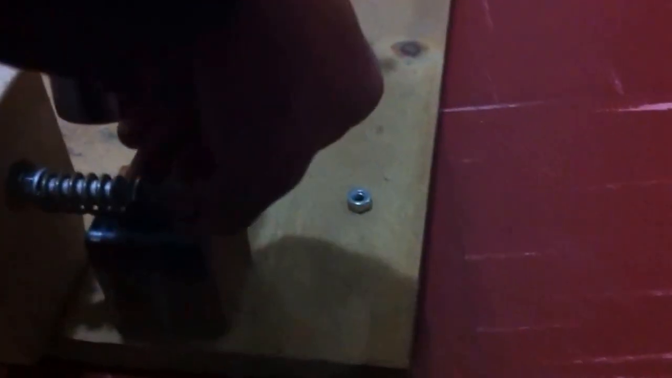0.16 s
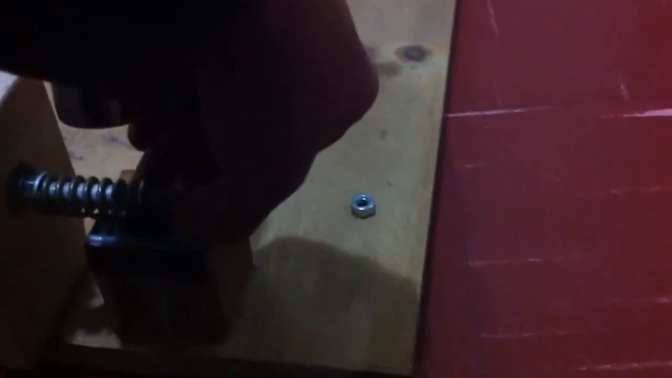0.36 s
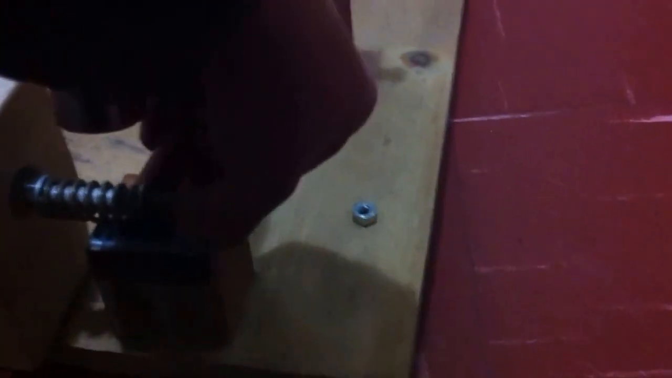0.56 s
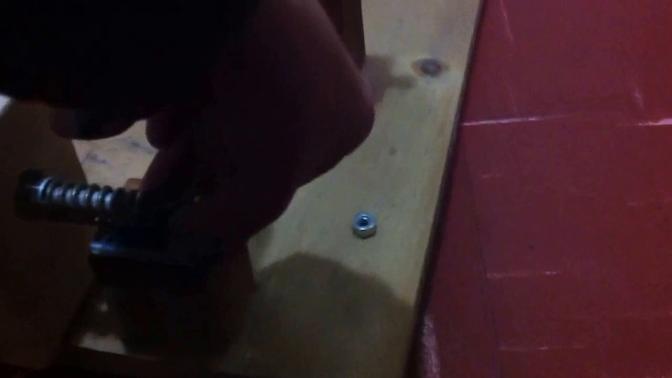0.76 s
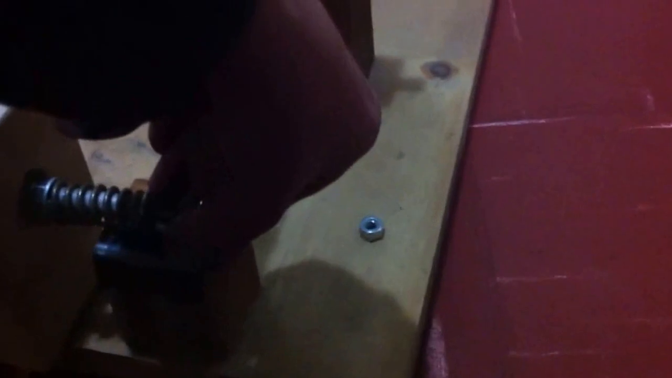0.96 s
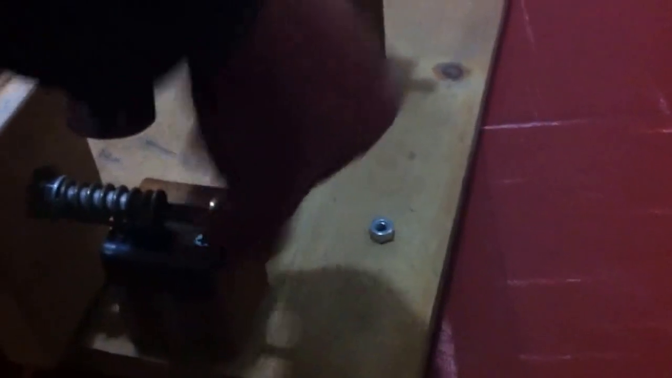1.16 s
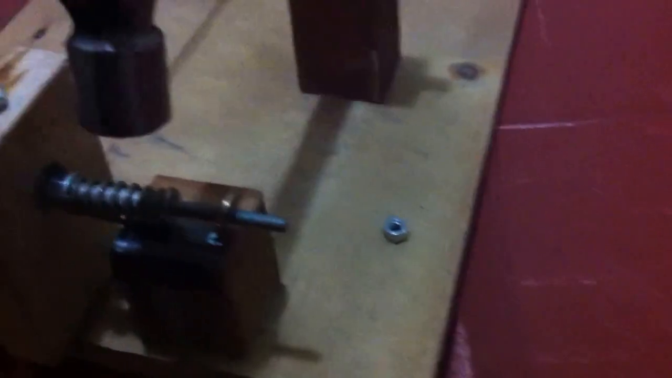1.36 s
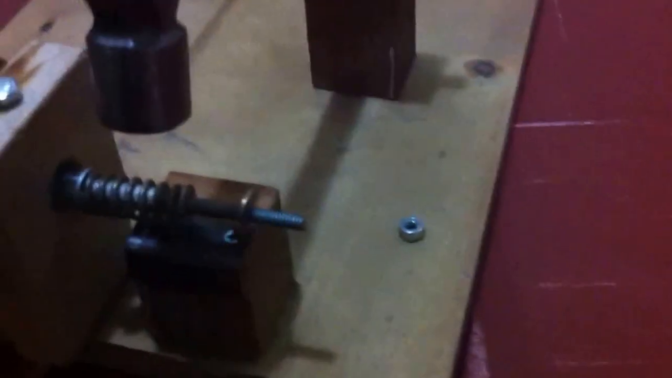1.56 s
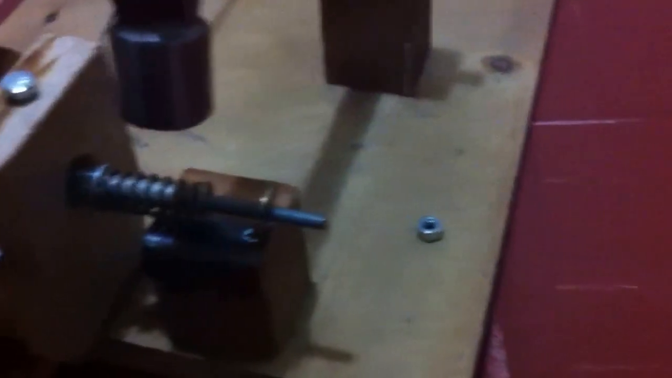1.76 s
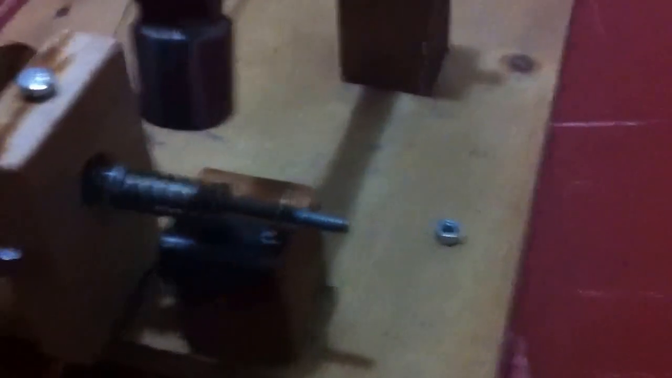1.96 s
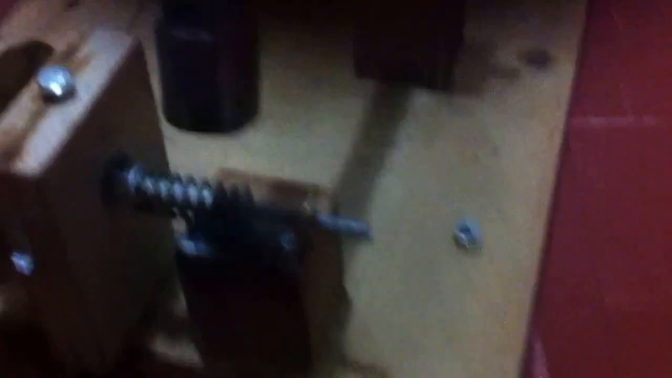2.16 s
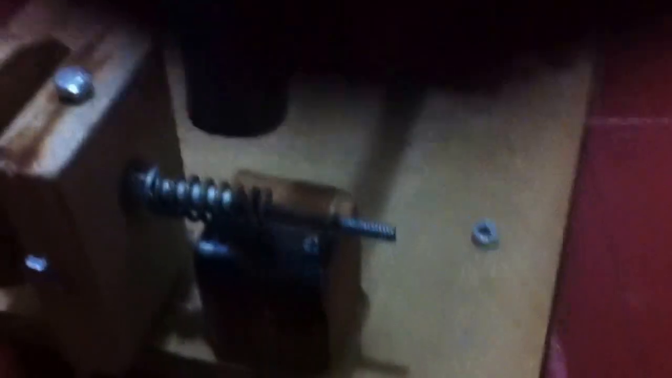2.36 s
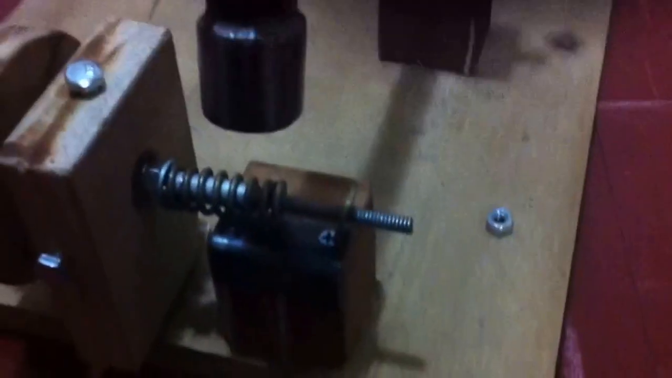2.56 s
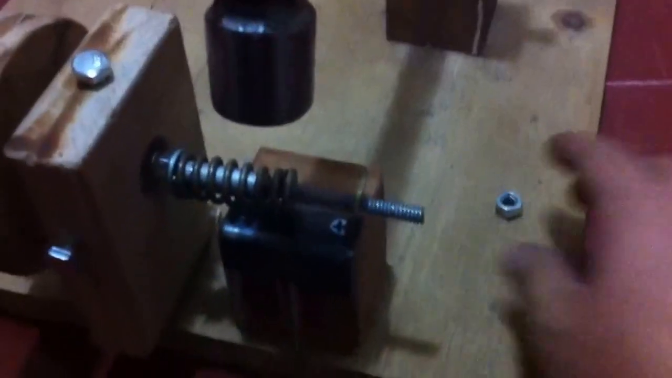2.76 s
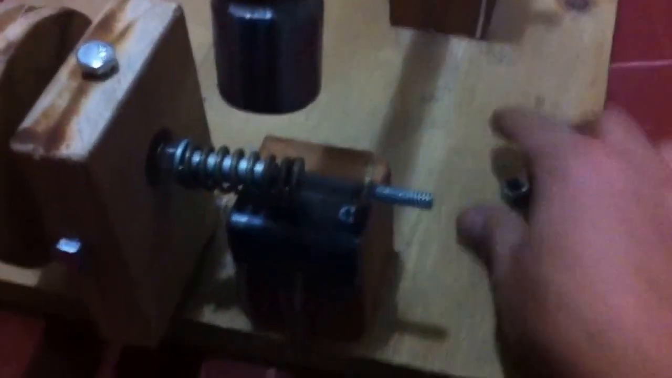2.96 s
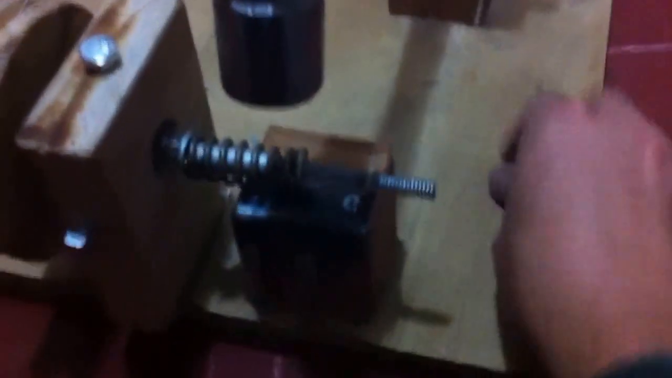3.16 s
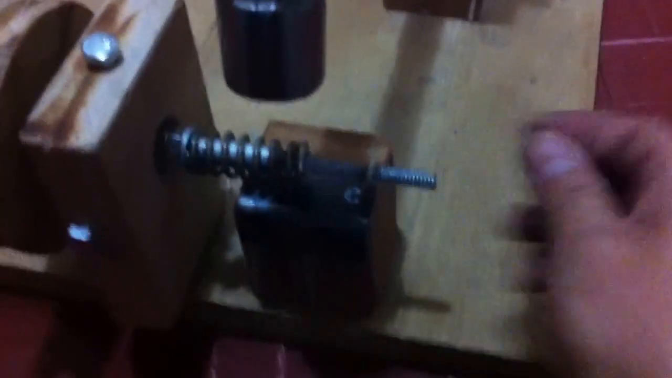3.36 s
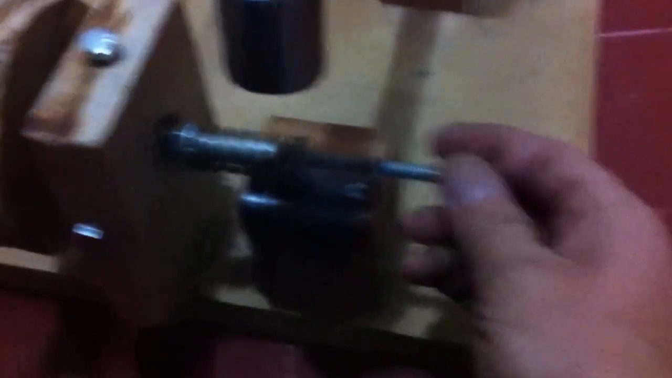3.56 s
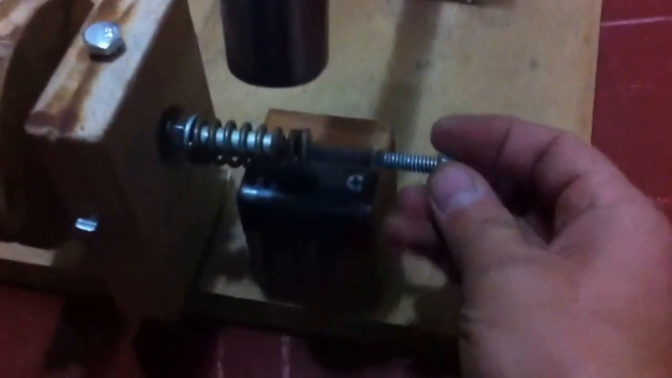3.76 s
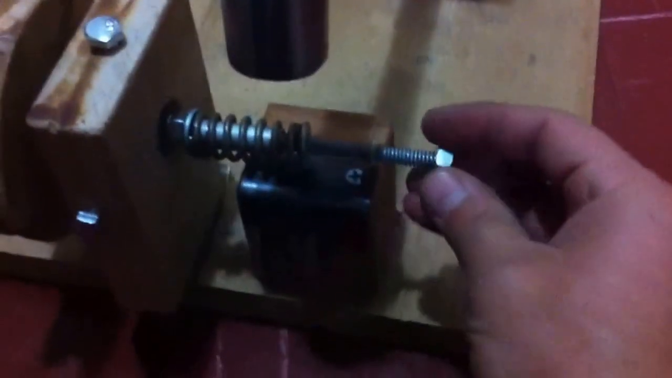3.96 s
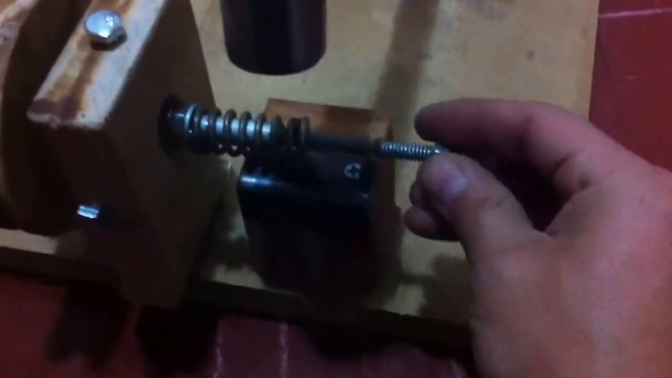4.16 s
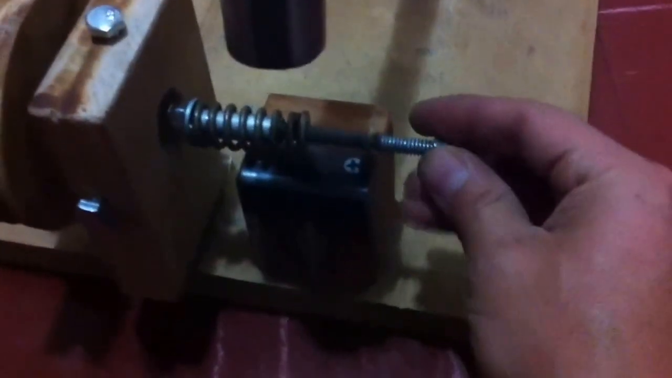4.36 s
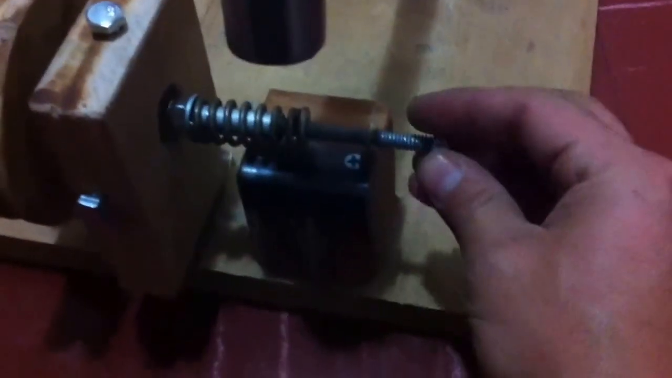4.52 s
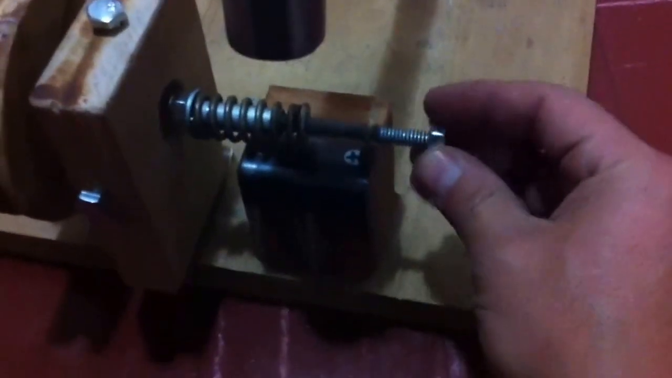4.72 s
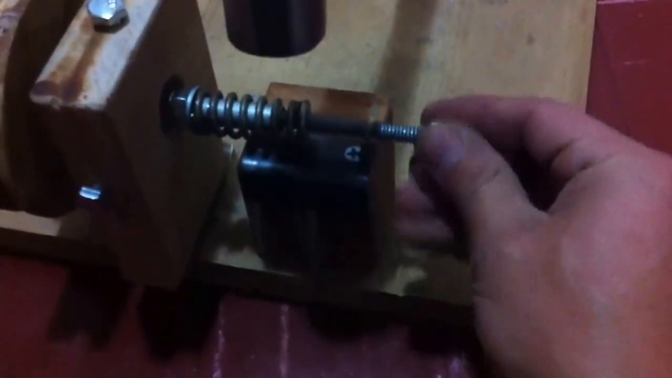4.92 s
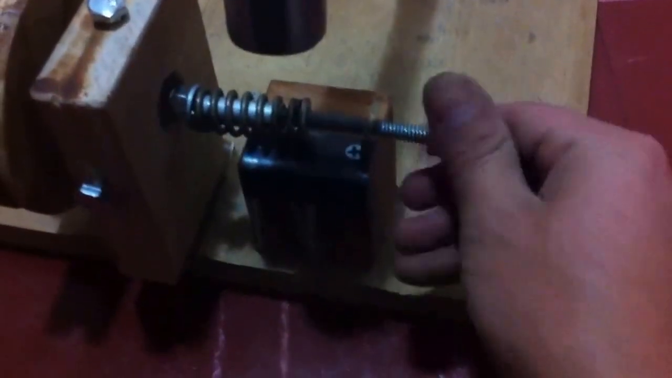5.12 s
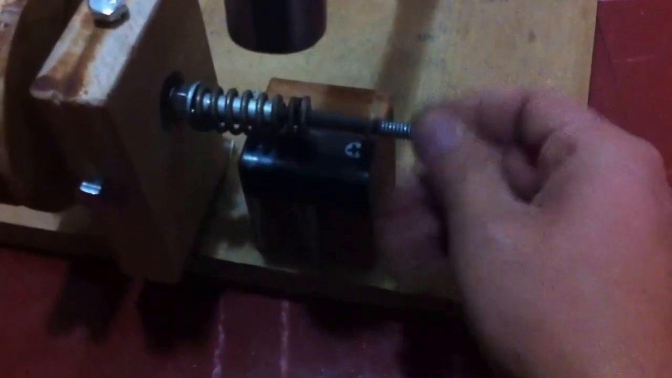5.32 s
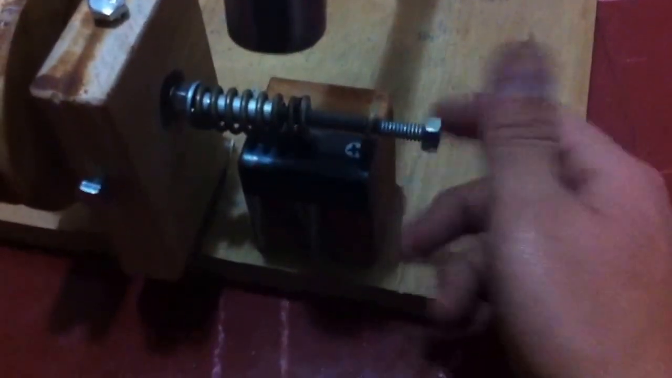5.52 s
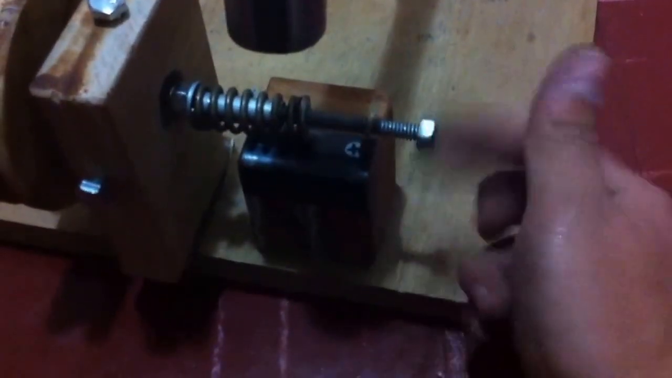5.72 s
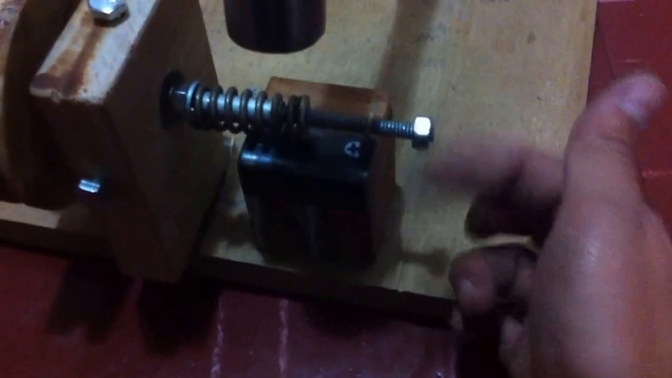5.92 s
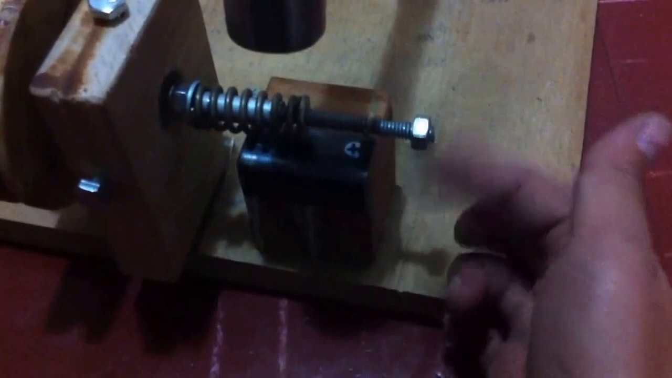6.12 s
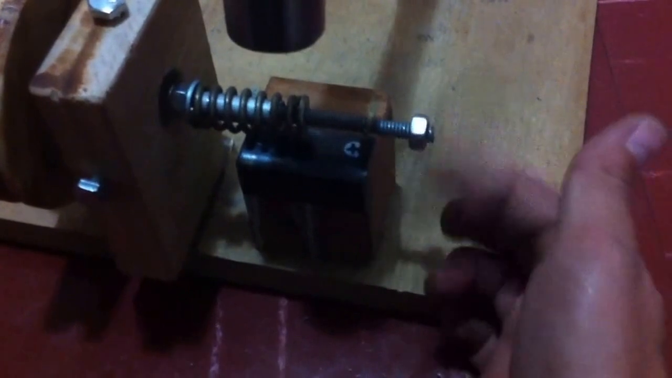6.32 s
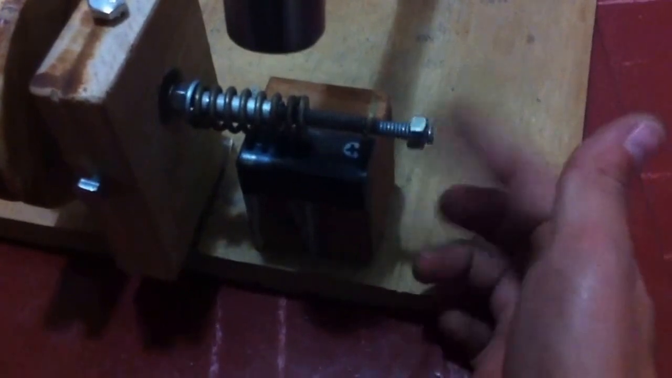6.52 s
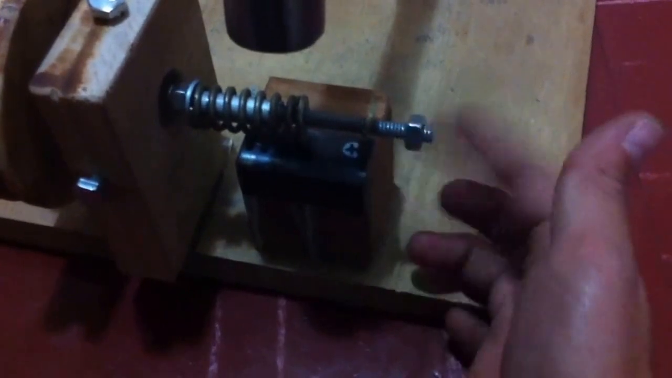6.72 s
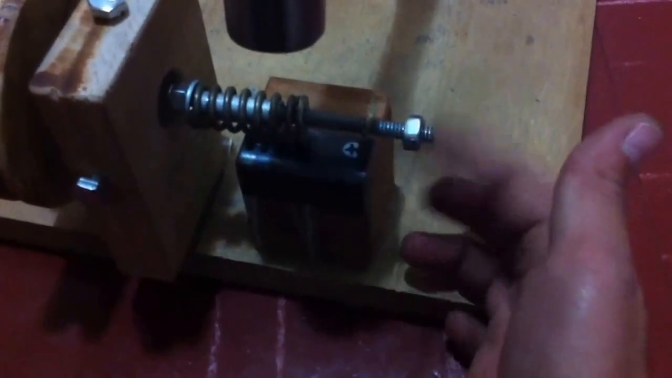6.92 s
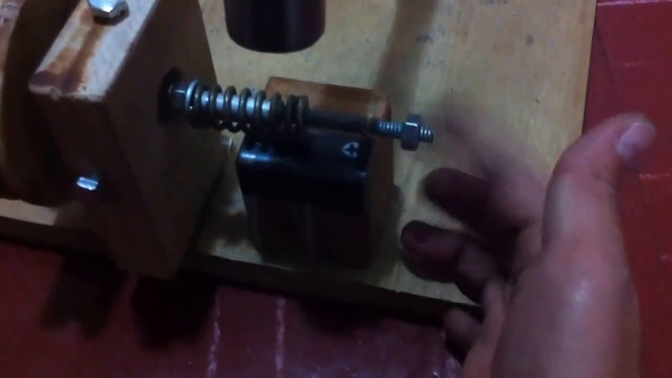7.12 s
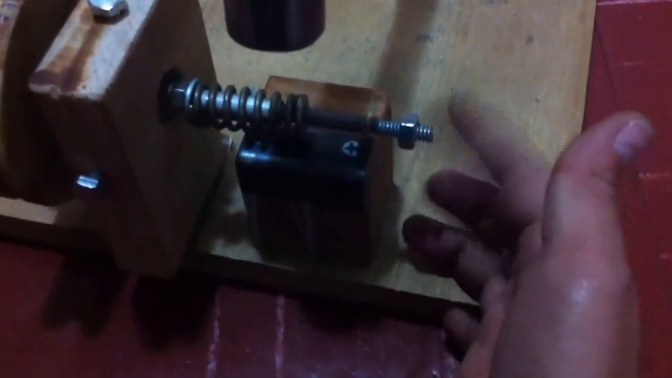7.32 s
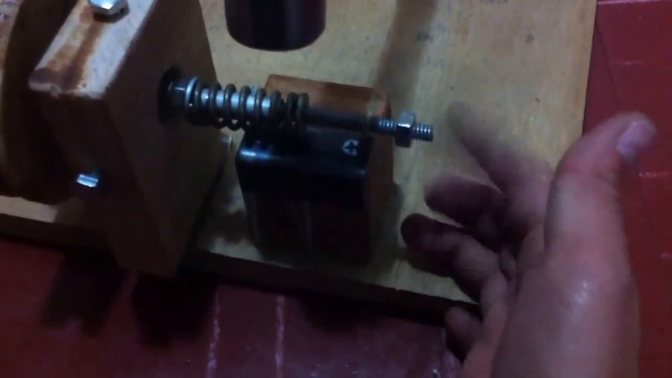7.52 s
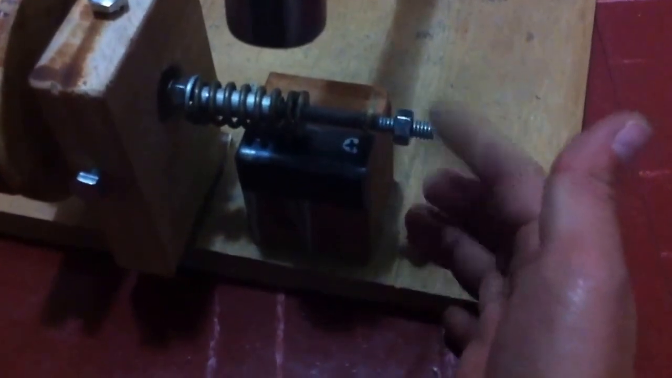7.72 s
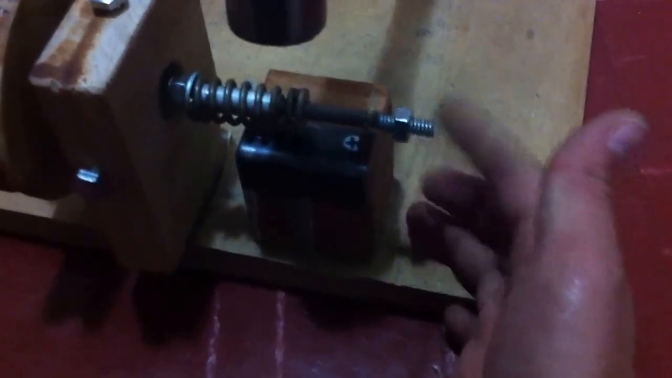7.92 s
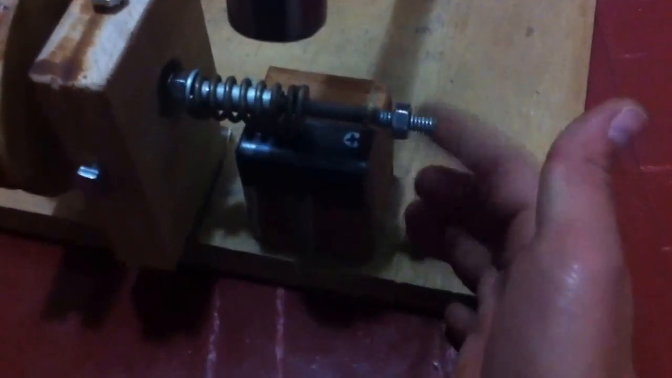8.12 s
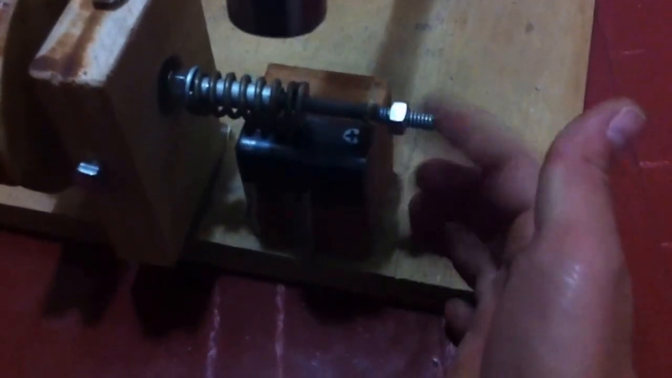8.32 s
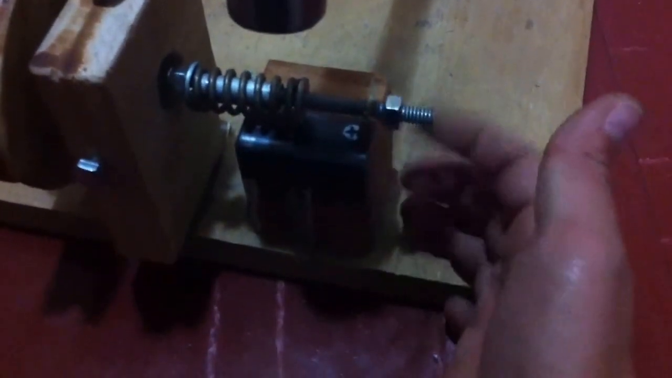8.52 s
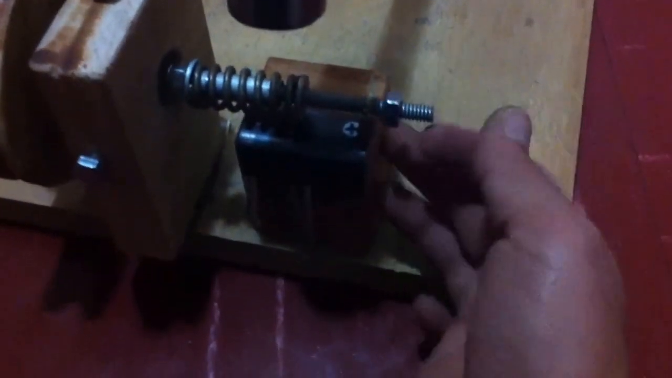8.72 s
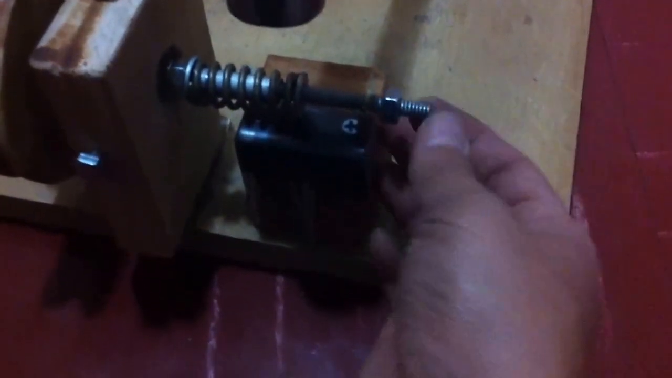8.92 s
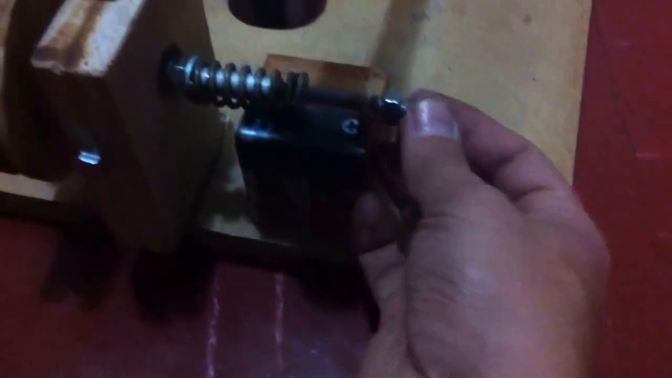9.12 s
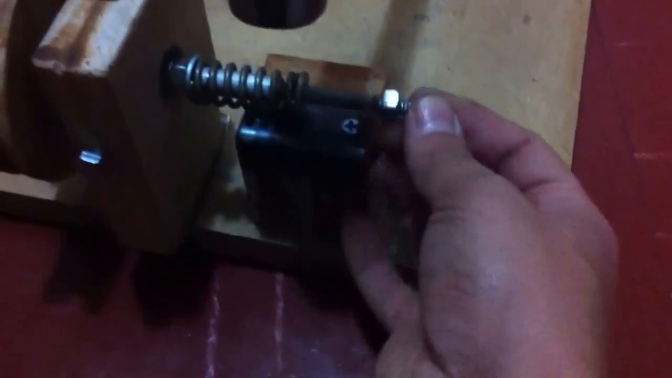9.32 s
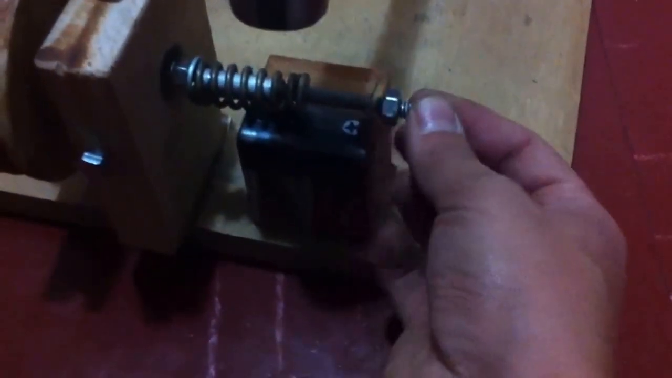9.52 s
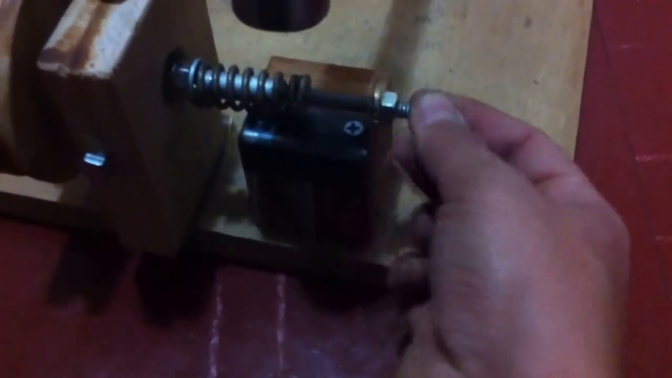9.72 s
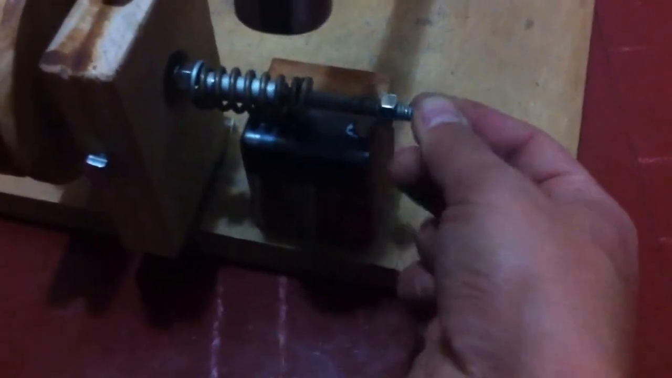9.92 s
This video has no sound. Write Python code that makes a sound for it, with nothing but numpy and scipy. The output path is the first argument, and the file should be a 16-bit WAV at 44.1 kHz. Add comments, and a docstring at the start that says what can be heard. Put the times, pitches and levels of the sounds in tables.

```python
"""In a small hard room a nut is spun along the threaded rod of a little wooden machine by finger flicks.
Each flick knocks the spring-loaded rod aside in its loose guide and it chatters back: swarms of tiny
impacts through resonances of rod and base board, with the spring singing on and the frame rocking.
A small case is handled close by: filtered impulses tap, shaped noise rustles and rumbles, a low sine bumps.
Behind it lie room air and hiss, both shaped noise."""
import sys
import numpy as np
from scipy import signal
from scipy.fft import rfft, irfft
from scipy.io import wavfile
from scipy.ndimage import uniform_filter1d

SR = 44100
rng = np.random.default_rng(int(sys.argv[2]) if len(sys.argv) > 2 else 0)


def inscribe(sig):
    """Save sig as 16-bit PCM at rate SR to the path in sys.argv[1].

    A 1-D sig is mono; a 2-D sig holds one channel per row.
    Samples are clipped to [-1, 1] before scaling.
    """
    pcm = np.round(np.clip(np.atleast_2d(sig).T, -1, 1) * 32767)
    wavfile.write(sys.argv[1], SR, pcm.astype(np.int16))


N = 440118  # length [samples]
BLOCK = 16384  # room for one clack or tap [samples]


def undb(db):
    """Decibels to gain."""
    return 10 ** (np.asarray(db) / 20)


def unit(x):
    """Scale to rms 1."""
    return x / np.sqrt(np.mean(x ** 2))


def freqs(size):
    """Frequencies of a spectrum [Hz], kept above zero."""
    return np.maximum(np.fft.rfftfreq(size, 1 / SR), 1)


def add(out, s, x):
    """Mix x into out at time s."""
    i = max(int(s * SR), 0)
    out[i:i + len(x)] += x[:max(len(out) - i, 0)]


def response(modes, size=BLOCK):
    """Spectrum of parallel resonances (frequency [Hz], width [Hz], level [dB]) of alternating sign."""
    f = freqs(size)
    return sum((-1) ** k * undb(db) / (1 + 1j * (f - hz ** 2 / f) / width)
               for k, (hz, width, db) in enumerate(modes))


def resonate(x, modes):
    """Pass x through the resonances."""
    return irfft(rfft(x) * response(modes, len(x)), len(x))


def colour(x, points):
    """Shape x by a spectrum of (frequency [Hz], level [dB]) points."""
    hz, db = np.transpose(points)
    gain = undb(np.interp(np.log(freqs(len(x))), np.log(hz), db))
    return irfft(rfft(x) * gain, len(x))


def walk(rate):
    """Random wander with rms 1: this many random levels per second, joined by ramps."""
    k = int(SR / rate)
    steps = np.repeat(rng.standard_normal(N // k + 1), k)[:N]
    return unit(uniform_filter1d(steps, k))


def flicks():
    """Each flick knocks the rod aside; it skids, falls back chattering and rebounds once.

    Rows: (time [s], length [s], level [dB], main resonance [Hz], hardness [dB/octave], free ring [dB]).
    """
    # a finger knocks the rod aside and it falls back:
    # (knock time [s], knock level [dB], knock's free ring [dB], fall time [s], fall level [dB],
    #  fall's free ring [dB], main resonance [Hz], hardness [dB/octave])
    finger_flicks = [(5.661, -28.5, 1, 5.715, -27.5, 2.5, 1415, -1.7),
                     (5.837, -27.5, -2, 5.869, -27, 3, 1450, -1.4),
                     (6.027, -24.5, 1.5, 6.053, -28, 5.5, 1466, -.1),
                     (6.244, -23, -3.5, 6.271, -28, 3, 1405, -.5),
                     (6.449, -25, 0, 6.467, -29, 1.5, 1440, -0.5),
                     (6.647, -24, -3, 6.676, -28, 3.5, 1485, -2),
                     (6.854, -21, -2, 6.883, -25, 4.5, 1505, -2),
                     (7.047, -25, 0.5, 7.074, -27, 4.5, 1416, -1),
                     (7.263, -28.5, 3.5, 7.297, -24.5, 3.5, 1520, -.2),
                     (7.484, -27, 1, 7.517, -14.5, 0.5, 1546, -1.4),
                     (7.684, -25.5, 8.5, 7.716, -23, 6, 1520, -1),
                     (7.880, -28.5, 2.5, 7.907, -25.5, 4.5, 1490, -.5),
                     (8.088, -27, -2.5, 8.115, -31.5, 3.5, 1470, -0.6),
                     (8.277, -25.5, 2, 8.308, -24.5, 5.5, 1500, -1.1),
                     (8.473, -28.5, 4, 8.516, -15.5, 5, 1596, 0.85),
                     (9.692, -38.5, -1.5, 9.739, -18.5, -5, 1443, 2),
                     (9.945, -28, 3.5, 9.969, -27, -3, 1390, 4)]
    knock_s, knock_harder_db = .0085, .55  # short and a little harder [s, dB/octave]
    # chatter length at this level; harder falls seat sooner, halving it every so many dB
    fall_s, fall_at_db, fall_halves_db = .0175, -26, 9.5
    skid_s, skid_db = .010, -12  # along the guide just before seating; level against the fall
    bounce_s, bounce_spread_s, bounce_length_s = .031, .004, .005  # delay after the fall, its spread, length
    bounce_db, bounce_scatter_db = -35.5, 2
    rows = []
    scatter = rng.standard_normal((len(finger_flicks), 2))
    for flick, (late, strong) in zip(finger_flicks, scatter):
        knock_at, knock_db, knock_free, fall_at, fall_db, free, hz, hard = flick
        fall_length = fall_s * 2 ** ((fall_at_db - fall_db) / fall_halves_db)
        bounce_at = fall_at + bounce_s + bounce_spread_s * late
        bounce_level = bounce_db + bounce_scatter_db * strong
        rows += [(knock_at, knock_s, knock_db, hz, hard + knock_harder_db, knock_free),
                 (fall_at - skid_s, skid_s, fall_db + skid_db, hz, hard, 0),
                 (fall_at, fall_length, fall_db, hz, hard, free),
                 (bounce_at, bounce_length_s, bounce_level, hz, hard, free)]
    return rows


def fingering():
    """Fingers and nut nudge the rod, and the slowly turned thread catches faintly; rows as for flicks."""
    # nudges: (time [s], length [s], level [dB], hardness [dB/octave],
    #  free ring [dB], low while fingers hold the rod)
    nudges = [(0.041, 0.028, -52.5, -1.5, -15), (0.170, .005, -47, -7.5, -7),
              (0.250, .024, -52.5, -6.5, -8), (0.543, .005, -31.5, 3, -10.5), (0.841, .02, -62, 0, -7),
              (3.652, .010, -36, -7, 1), (3.666, .01, -39.5, -1.5, 7), (3.709, 0.0063, -37.5, 1, 9),
              (3.768, 0.016, -47, -5.5, 5), (3.792, .0067, -39.5, 0, -1), (3.896, .005, -41.5, -7.5, -3.5),
              (3.976, .0064, -36, -4, -2.5), (4.678, .0064, -42, 0, 5.5), (4.858, .007, -48, -3.5, -1),
              (5.039, 0.032, -54.5, -7, 6.5), (5.152, .007, -49.5, -7, -5), (5.231, .012, -46, -1.5, 4),
              (5.356, 0.023, -49, -3, 4), (5.420, .016, -45, -1.3, -3.5), (5.456, .014, -37, -6, 2.5),
              (5.471, .012, -32.5, -3, -3), (5.509, .008, -32.5, -1, 2), (5.675, .014, -29.5, -.8, 7),
              (8.691, .0034, -28, 2.5, 4.5), (8.752, .02, -51.5, 0, 7), (9.104, .0064, -41.5, 1.5, 2.5),
              (9.181, .024, -52.5, -4.5, -.5), (9.448, .029, -41, 1.5, -1), (9.471, .01, -38.5, -2.5, -9.5),
              (9.959, .01, -30.5, 5, 8)]
    # slow turning between the fingers: (start [s], end [s])
    turns = [(0.05, 0.38), (4.15, 4.42), (4.5, 4.8), (4.85, 5.4), (9.0, 9.65)]
    tip_hz = 1421  # main resonance with the fingers at the tip of the rod
    catches_per_s, catch_s, catch_hardness = 8, .032, -5  # [1/s, s, dB/octave]
    catch_db, catch_scatter_db = -65.5, 2.5
    rows = [(s, length, db, tip_hz, hard, free) for s, length, db, hard, free in nudges]
    for (start, end), draws in zip(turns, rng.standard_normal((len(turns), 32, 2))):
        for k, (late, strong) in enumerate(draws):
            s = start + (k + .5 + np.tanh(late) / 2) / catches_per_s  # uneven steps
            if s < end:
                db = catch_db + catch_scatter_db * strong
                rows.append((s, catch_s, db, tip_hz, catch_hardness, 0))
    return rows


def chatter(length):
    """A first touch, then a swarm of steel-on-steel impacts round one seating blow, over thread scrape."""
    rate, scatter_db = 1400, 4.5  # impacts per second from the median gap; spread of their strength
    touch, slam, slam_at = 1.62, 1.8, .4  # strengths; the blow lands at this share of the length
    scrape, rise, fall = .047, .21, 2.1
    gap, size, scuff = rng.standard_normal((3, BLOCK))
    times = np.cumsum(np.exp(gap[:200] / 2)) / rate
    places = ((times - times[0]) * SR).astype(int) % BLOCK
    hits = np.zeros(BLOCK)
    hits[places] = np.sign(size[:200]) * undb(scatter_db * np.clip(size[-200:], -2, 1))
    hits[0] = touch
    hits[int(slam_at * length * SR)] += slam
    u = np.arange(BLOCK) / SR / max(length, .002)
    swell = (u + .032) ** rise * np.exp(-fall * u ** 2 / 2)
    return (hits + scrape * scuff) * swell


def strike(length, shape):
    """One chatter through a spectrum, its energy that of rms 1 held over its length."""
    ring = irfft(rfft(chatter(length)) * shape)[:BLOCK // 2]
    return unit(ring) * np.sqrt(length * SR / len(ring))


def rod(clacks):
    """Every clack rings the heavily damped rod and shakes the board; returns (direct, outward) sound."""
    # rod in its guide: (frequency [Hz], width [Hz], mean level [dB])
    rod_modes = [(945, 48, -7), (1134, 280, -9.5), (1907, 140, -5), (2056, 157, -2.5), (2293, 337, -5),
                 (2564, 136, 1.5), (3063, 350, -7.5), (3460, 270, -6), (3770, 226, -7), (4110, 536, -9.5),
                 (4780, 420, -11), (5570, 420, -13.5), (6520, 710, -12.5), (8070, 880, -33.5),
                 (10920, 1100, -34.5), (12760, 7500, -29.5)]
    # base board: (frequency [Hz], width [Hz], level [dB])
    board_modes = [(184.7, 108, -4), (313, 70, -5), (432, 79, -1), (469, 47, 3), (622, 76, -3),
                   (719, 24, 4), (924, 140, -3)]
    main_width_hz, main_db, main_scatter_hz, modes_scatter_db = 170, 4.0, 15, 1.36
    free_hz, free_octaves = 2650, .37  # band where the rod rings when free
    # board level under a clack of this level, and its dB per dB of clack
    board_db, board_at_db, board_slope = -55, -27, .72
    board_share = .8  # dB the board gains for each dB of free ring lost to the fingers
    steel, wood, f = np.zeros((2, N)), np.zeros(N), freqs(BLOCK)
    # a thin rod radiates almost no bass
    bass_cut = signal.butter(3, 980, "high", fs=SR, output="sos")
    thin = signal.sosfreqz(bass_cut, f, fs=SR)[1]
    board = response(board_modes)
    octaves = np.log2(np.clip(f, 1400, 9000) / 1400)
    free_band = np.exp(-(np.log2(f / free_hz) / free_octaves) ** 2 / 2)
    # the contacts click over a wide band; their finite duration softens the very top
    contact = 1j * response([(4300, 6360, -22)])
    soft = 1 / np.sqrt(1 + (f / 11500) ** 4)
    for s, length, db, hz, hardness, free_db in clacks:
        # each contact point favours the modes a little differently
        favour = modes_scatter_db * rng.standard_normal(len(rod_modes))
        modes = [(m, w, g + e) for (m, w, g), e in zip(rod_modes, favour)]
        # the main resonance follows the contact point
        main = (hz + main_scatter_hz * rng.standard_normal(), main_width_hz, main_db)
        # harder contact is brighter
        tilt = undb(hardness * octaves + free_db * free_band)
        shape = thin * soft * (response(sorted(modes + [main])) + contact) * tilt
        for direction in steel:  # towards the listener, towards the walls
            add(direction, s, strike(length, shape) * undb(db))
        wood_db = board_db + board_slope * (db - board_at_db) - board_share * free_db
        add(wood, s, strike(length, board) * undb(wood_db))
    return steel + wood


def spring(x):
    """The coil spring and free rod sing on after each clack: decaying sines, 15 dB below the clacks."""
    # ringing steel: (frequency [Hz], relative level [dB], time to fall 60 dB [s])
    spring_modes = [(938, -15, .35), (1156, -3, .3), (1235, -6, .3), (1527, -5, .3), (2060, -2, .3),
                    (2364, 2, .38), (2571, -8, .3), (3018, -4, .3), (3486, -4, .3), (3792, -3, .3),
                    (4970, 2, .4), (5150, -1, .35)]
    t = np.arange(SR // 2) / SR
    ring = sum(undb(g) * np.sin(2 * np.pi * hz * t) * np.exp(-np.log(1000) * t / t60)
               for hz, g, t60 in spring_modes)
    return unit(signal.oaconvolve(x, ring)[:N]) * np.std(x) * undb(-15)


def frame(clacks):
    """Clacks strong enough to take up the slack rock the wooden frame, which gives less and less."""
    # frame rocking on the table: (frequency [Hz], width [Hz], relative level [dB])
    frame_modes = [(44.7, 63, -12.5), (78.4, 40, -9), (148.4, 6.7, 6.5), (186.8, 8.6, 1), (216.5, 14, -1)]
    db, slack_db = -68, -32  # rms over the whole scene; clack level that takes up the slack
    pushes = np.zeros(N)
    for s, _, clack_db, *_ in clacks:
        excess = np.maximum(undb(clack_db) - undb(slack_db), 0)
        add(pushes, s, [np.cbrt(excess)])
    return unit(resonate(np.pad(pushes, (0, SR)), frame_modes)[:N]) * undb(db)


def room(x):
    """Dense reflections off floor and walls: decaying noise in three bands, the bass lasting longest."""
    # colour of the room's answer: (frequency [Hz], level [dB])
    room_colour = [(100, 6), (600, 12), (1400, -2), (2000, 0.5), (2700, 0.5), (4000, 2.5), (6500, -1),
                   (10000, 0), (16000, -1)]
    db, build_s = -6.0, .0081
    t60s = (.39, .34, .34)  # low, mid, high: time to fall 60 dB [s]
    t = np.arange(SR * 3 // 4) / SR
    noise, tail = rng.standard_normal(len(t)), 0
    edges, f = np.log([400, 2500, 10000]), freqs(len(t))
    for share, t60 in zip(np.eye(3), t60s):
        band = irfft(rfft(noise) * np.interp(np.log(f), edges, share), len(t))
        tail = tail + band * np.exp(-np.log(1000) * t / t60)
    tail = colour(tail / np.linalg.norm(tail), room_colour)
    tail = tail * (1 - np.exp(-(t / build_s) ** 2))  # reflections build up
    return signal.oaconvolve(x, tail[:SR // 2])[:N] * undb(db)


def handling():
    """Dead little taps ring a small case with a tick on top; fainter ones come before as the grip shifts."""
    # soft, dry taps: (time [s], level of the loudest 3 ms before trim [dB], treble before trim [dB])
    taps = [(1.989, -38.5, -33), (2.191, -46, -15), (2.226, -46, -8), (2.307, -33.5, -7), (2.346, -24, -3),
            (2.355, -42, 12), (2.367, -38.5, 1), (3.102, -41, -26), (3.172, -49, 1), (3.229, -47, -18)]
    # what a tap rings: (frequency [Hz], width [Hz], level [dB])
    case_modes = [(171, 180, 0), (445, 100, 6.5), (750, 250, 2.5)]
    tap_trim_db, treble_trim_db = -6, 1
    rub, rub_s = .056, .0059  # noise level beside the impulse; its decay [s]
    tick_mode = [(2700, 1700, 0)]
    fidgets = [(s, -53.5, -19) for s in rng.uniform(1.4, 1.9, size=7)]  # columns as for taps
    out, t = np.zeros(N), np.arange(BLOCK) / SR
    # a small case gives out no deep bass
    small = signal.butter(2, 100, "high", fs=SR, output="sos")
    for s, db, treble_db in taps + fidgets:
        rubbing = rub * rng.standard_normal(BLOCK) * np.exp(-t / rub_s)
        force = signal.unit_impulse(BLOCK) + rubbing
        knock = signal.sosfilt(small, resonate(force, case_modes))
        tick = resonate(resonate(force, tick_mode), tick_mode)
        tap = unit(knock) + undb(treble_db + treble_trim_db) * unit(tick)
        power = uniform_filter1d(tap ** 2, size=132, mode="constant")
        add(out, s, tap / np.sqrt(power.max()) * undb(db + tap_trim_db))
    return out


def bump():
    """One low bump of the table: a sine that swells and dies within a few cycles."""
    start_s, gain_db, hz, rise_s = 1.8, -58, 115, .011
    t = np.maximum(np.arange(N) / SR - start_s, 0)
    swell = t / rise_s * np.exp(2 - 2 * t / rise_s)
    return undb(gain_db) * np.sin(2 * np.pi * hz * t) * swell


def background():
    """Hand and sleeve movements swell as grainy rustle and low rumble over room air and smooth hiss."""
    # movements, levels before trim:
    # (middle time [s], half length [s], rustle level [dB], rumble level [dB])
    moves = [(0.0, .06, -53.5, -72), (0.25, 0.098, -75, -64.5), (0.838, .1, -68.5, -64),
             (1.54, 0.18, -71, -70), (2.15, .32, -69, -65.5), (2.59, 0.18, -59, -67),
             (3.214, 0.22, -61, -65.5), (5.05, 0.29, -68.5, -82), (6.417, .04, -75, -59.5),
             (8.98, .17, -69, -63.5), (9.307, 0.045, -77, -65), (9.82, .12, -78, -63)]
    # colours of the rustle, of the air and rumble, and of the hiss: (frequency [Hz], level [dB])
    rustle_colour = [(150, -30.5), (400, -10), (750, -3), (1100, -11), (1600, -3), (2400, 0.5),
                     (4500, -6.5), (7000, -13.5), (10000, -20), (16000, -30.5)]
    air_colour = [(15, -44), (25, -26), (75, -11.5), (102, -11), (144, 0.5), (168, 2), (417, -5),
                  (900, -7.5), (1400, -7), (1700, -9), (2500, -22.5), (3250, -42), (5500, -120)]
    hiss_colour = [(530, -21), (900, 3), (1550, -15), (4900, 6.5), (5320, 3), (6430, 3.5), (15000, -0.5)]
    hand_db, air_db = -75.5, -71.5  # a hand never quite at rest; the still room; both before trim
    rustle_trim_db, air_trim_db, hiss_db = -1, 1, -71.5
    grain_db, flutter_db = 2, 2  # spread of the level wander
    colours = (rustle_colour, air_colour, hiss_colour)
    rustle, air, hiss = (unit(colour(rng.standard_normal(N), c)) for c in colours)
    t = np.arange(N) / SR
    rustle_power, air_power = undb(hand_db) ** 2, undb(air_db) ** 2
    for s, half_s, rub_db, rumble_db in moves:
        swell = np.exp(-((t - s) / half_s) ** 2)
        rustle_power = rustle_power + swell * undb(rub_db) ** 2
        air_power = air_power + swell * undb(rumble_db) ** 2
    rustle = rustle * np.sqrt(rustle_power) * undb(rustle_trim_db + grain_db * walk(170))
    air = air * np.sqrt(air_power) * undb(air_trim_db + flutter_db * walk(30))
    return rustle + air + hiss * undb(hiss_db)


def scene():
    """The machine in its room, with the small noises of the hands."""
    clacks = flicks() + fingering()
    direct, outward = rod(clacks)
    machine = direct + spring(direct) + frame(clacks)
    hands = handling() + bump() + background()
    return (machine + room(outward) + hands)[None]


def record(dry):
    """A steep low-pass removes everything above about 15.8 kHz."""
    return signal.sosfilt(signal.ellip(10, .2, 70, 15800, fs=SR, output="sos"), dry)


dry = scene()
out = record(dry)
inscribe(out)
```